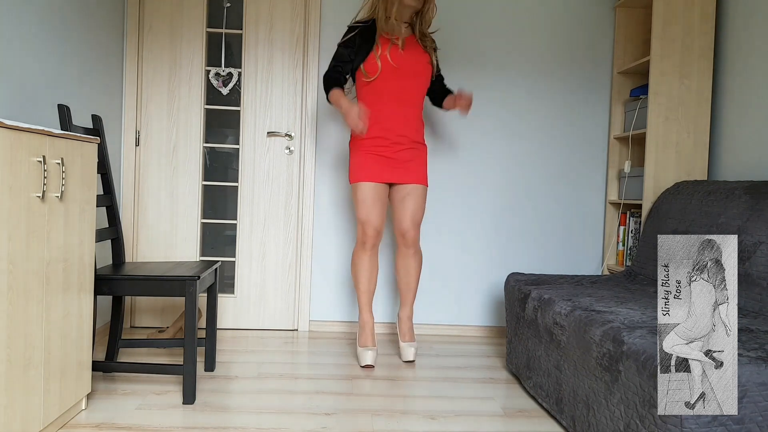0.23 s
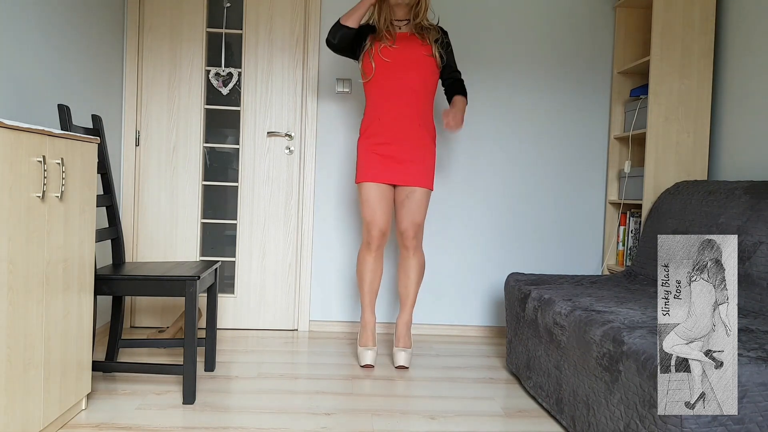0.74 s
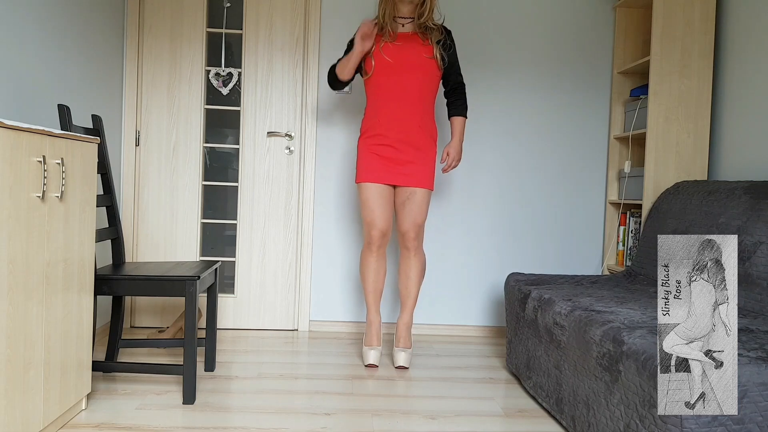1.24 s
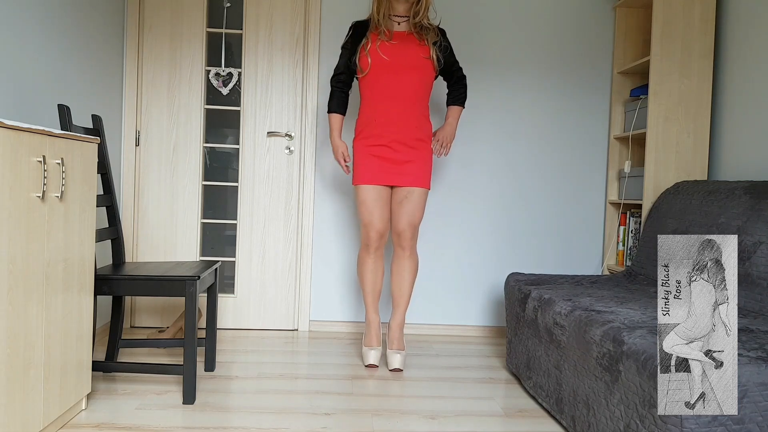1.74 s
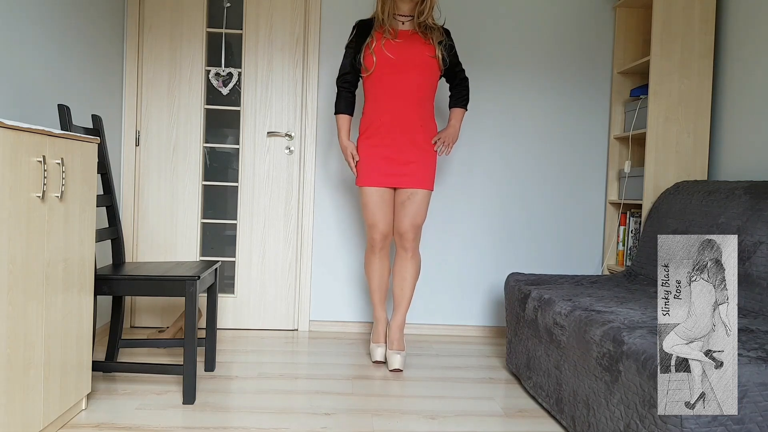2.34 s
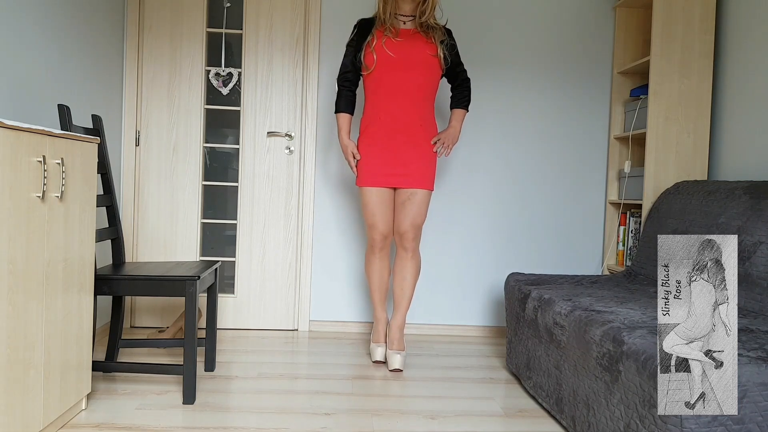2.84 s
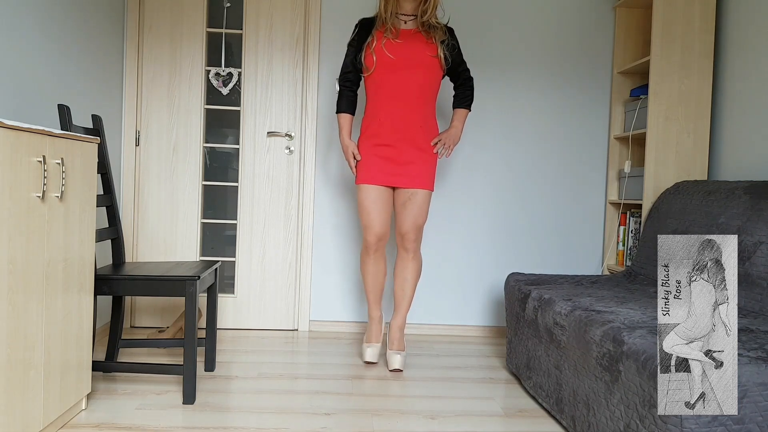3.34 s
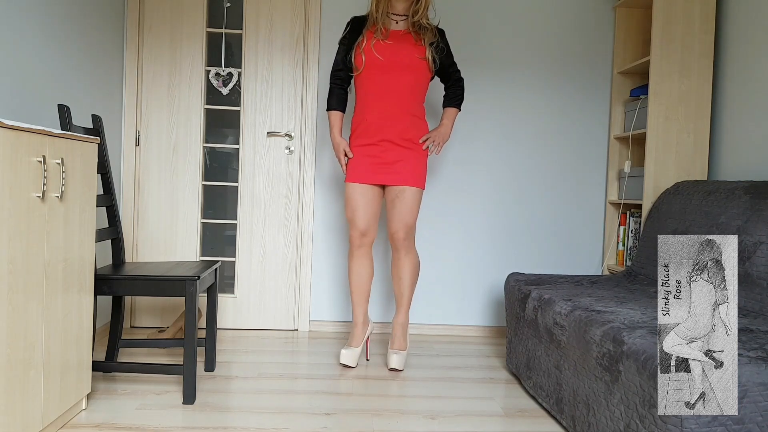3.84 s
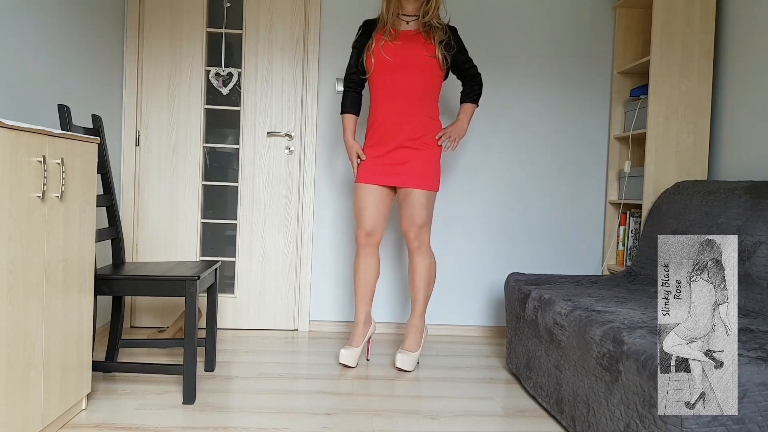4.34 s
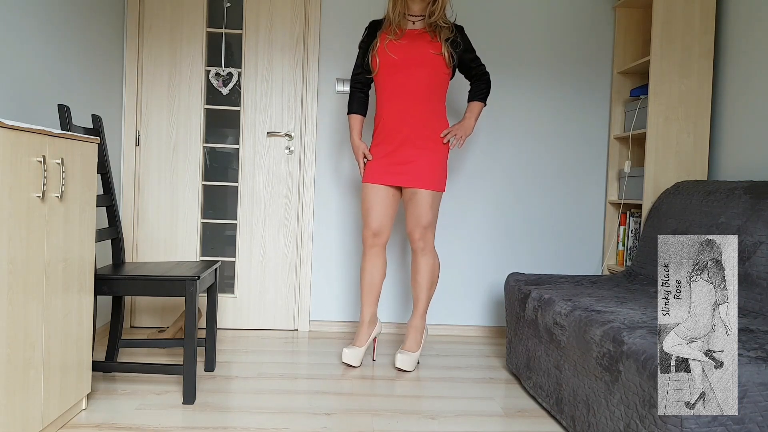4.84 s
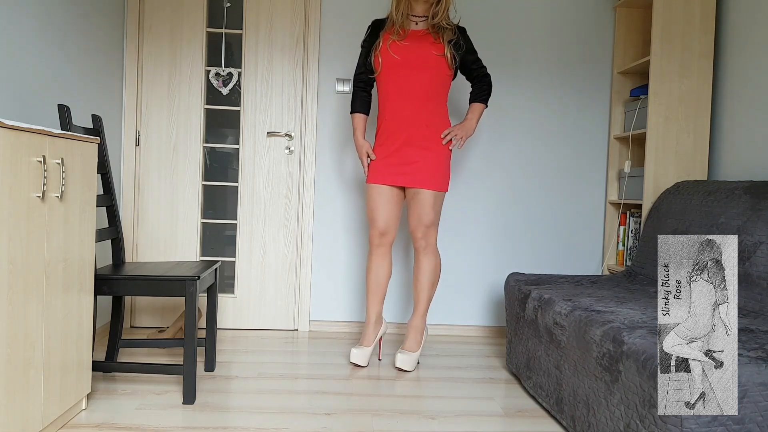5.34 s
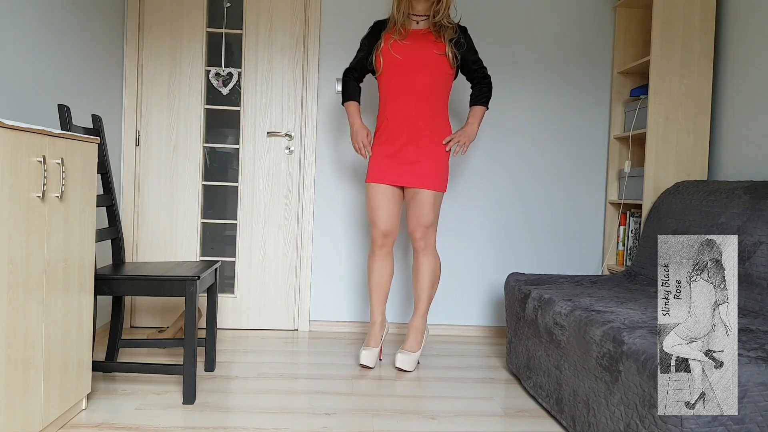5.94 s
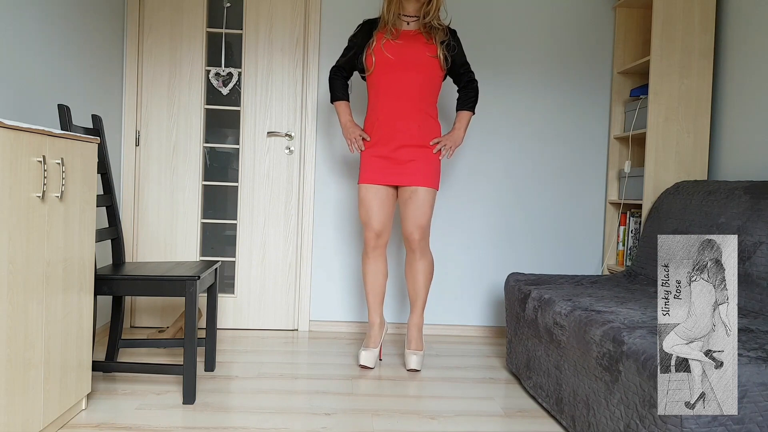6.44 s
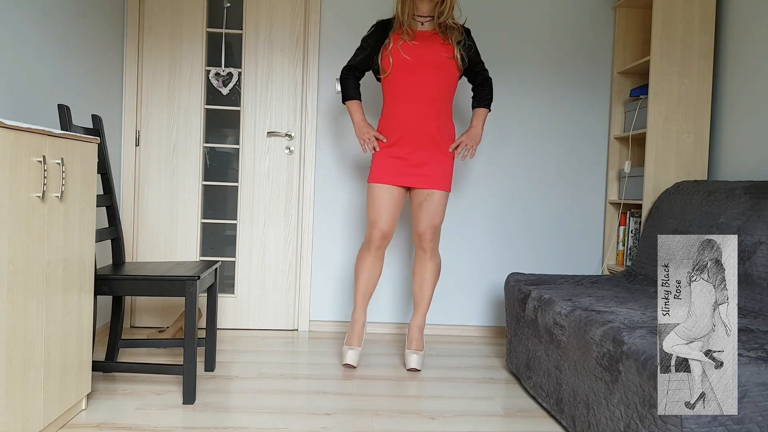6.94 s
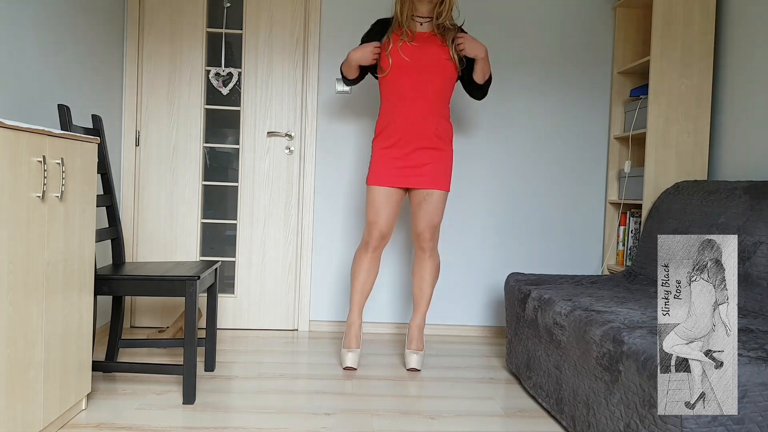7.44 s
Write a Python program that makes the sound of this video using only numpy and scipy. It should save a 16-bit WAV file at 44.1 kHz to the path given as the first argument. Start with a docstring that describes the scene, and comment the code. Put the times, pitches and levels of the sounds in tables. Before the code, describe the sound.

High heels step and shift on a hollow laminate floor in a small furnished room, a few metres from the microphone. The hardest step comes early, with a dry swish and a bright slap. Lighter knocks and soft sole drags follow, pause for about a second, then go on unevenly to the end. Each knock has a short room echo, over quiet room tone and hiss.

```python
"""High heels step and shift on a hollow laminate floor in a small furnished room, a few metres away.
From the start, over quiet room tone and microphone hiss, each heel knocks the boards, the near walls
repeat the knock, and soles rub between the steps. Half a second in, the hardest step lands with a dry
swish and a bright slap. Lighter steps and drags follow, pause for about a second near the three-second
mark, then go on unevenly to the end."""
import sys
import numpy as np
from scipy import signal
from scipy.fft import rfft, irfft, next_fast_len
from scipy.io import wavfile
from scipy.ndimage import uniform_filter1d, map_coordinates

SR = 44100
rng = np.random.default_rng(int(sys.argv[2]) if len(sys.argv) > 2 else 0)


def dump(signal):
    """Clip the signal to [-1, 1] and save it as 16-bit WAV at the path in sys.argv[1]."""
    limited = np.clip(np.atleast_2d(signal).T, -1, 1)
    pcm = np.round(limited * 32767).astype(np.int16)
    wavfile.write(sys.argv[1], SR, pcm)


N = 339744

# Spectrum of room tone and hiss: (frequency [Hz], relative level [dB])
TONE_SPECTRUM = [(15, -6), (40, 3), (60, -0.5), (115, -1), (250, -2.5), (340, -12), (410, -3), (600, -18.5),
                 (1000, -6.5), (2000, -12.5), (5000, -23), (8500, -27), (11000, -24.5), (14500, -20)]
# Left-right coherence of the room tone: (frequency [Hz], coherence [0-1])
TONE_COHERENCE = [(25, 0.9), (60, 0.83), (180, 0.44), (400, 0.85), (800, 0.11), (1650, 0), (5000, 0)]
# Heel impacts: (time [s], knock peak before the room [dB], knock pitch [Hz],
# thud level [dB re knock], click level [dB re knock], click pitch [Hz])
IMPACTS = [(0.0, -32, 585, -22, -11.5, 2630), (0.212, -59.5, 360, -28, 0, 2450),
           (0.321, -54.5, 372, -24, 0, 2020), (0.527, -26, 504, -27, -12, 3200),
           (0.979, -46.5, 1200, -39, -5, 2130), (1.156, -57, 786, -39, -7, 3290),
           (1.198, -55.5, 530, -38, -16, 2736), (1.25, -52.5, 553, -26, -19, 2860),
           (1.292, -57, 500, -12, -3, 2520), (1.554, -57, 394, -20, -19, 2470),
           (1.601, -50.5, 1140, -26, -7, 2150), (1.772, -37, 554, -20.5, -13, 3840),
           (1.862, -39, 620, -21, -24, 2400), (2.121, -62, 355, -16, 8, 3366),
           (2.237, -36.5, 630, -21, -7, 4280), (2.484, -54, 346, -39, -3, 2250),
           (2.496, -48, 653, -45, -36, 2300), (3.71, -42.5, 585, -21, -11.5, 2606),
           (3.749, -42.5, 670, -25.5, -28, 2447), (4.169, -51, 472, -16.5, -6, 2710),
           (4.24, -29.5, 605, -28, -19, 2770), (4.471, -58.5, 530, -33, -2, 2500),
           (4.609, -50, 620, -25, -13, 2750), (4.787, -57, 552, -25, -3, 3430),
           (4.925, -45.5, 550, -29, -15, 2410), (5.264, -31, 606, -29, -18.5, 2970),
           (6.083, -58, 360, -14, -8, 3498), (6.403, -61, 377, -16, 18, 3560),
           (6.44, -57.5, 355, -22, 7.5, 2200), (6.477, -49, 1190, -26, -18, 2450),
           (6.572, -39.5, 557, -22, -17.5, 2550), (6.766, -33.5, 640, -27.5, -17, 2470),
           (6.889, -56, 470, -27, -5, 2310), (7.2, -33.5, 470, -20, -19.5, 3230),
           (7.257, -44, 430, -18, -10.5, 2380), (7.597, -62, 353, -13.5, -9, 2470)]
# Early reflections from near surfaces: (delay [s], left gain [dB], right gain [dB])
REFLECTIONS = [(.0025, -3.5, 6.5), (.0045, 6, -6), (.0075, 2, -2), (.0100, 0.5, -30), (.0140, 7, -14.5),
               (0.018, -19, -21), (0.023, -35, 3.5), (.0300, 0.5, -26)]
# Normal modes of floor and room: (frequency [Hz], bandwidth [Hz], mean gain [dB])
MODES = [(128.5, 8.5, 16.5), (172.5, 5.5, 27), (238, 22, 17), (311, 28.7, 17), (344.8, 5.5, 17.5),
         (536.5, 2.9, 4.5), (542, 54, 12), (672.6, 36, 15.5), (820, 25, 12), (826, 6.9, 19), (1030, 15, -5)]
# Reverberation time of the diffuse tail: (frequency [Hz], time to fall 60 dB [s])
TAIL_T60 = [(100, 0.73), (260, 0.53), (700, 0.29), (1800, 0.48), (5000, 0.39), (12000, 0.75)]
# Left-right coherence of the diffuse tail: (frequency [Hz], coherence [0-1])
TAIL_COHERENCE = [(60, 0.94), (180, 0.98), (550, 0.67), (1650, 0.046), (4960, 0.045), (15000, 0.02)]
# Soles dragging: (start [s], duration [s], rumble level [dB], brightness [0-1], scuff level [dB])
DRAGS = [(0, 0.034, -51, 0.2, -63.5), (0.097, 0.11, -58.5, 0.84, -73.5), (0.317, 0.054, -66, 0.91, -69),
         (0.506, .02, -40, 0.084, -53), (0.567, 0.15, -57.5, 0.83, -65.5), (0.688, 0.085, -60, 1, -62),
         (1.12, 0.21, -69.5, 0.21, -74.5), (1.482, 0.11, -66, 0.41, -71.5), (1.76, .15, -56, 0.36, -71.5),
         (1.94, .13, -56.5, 0.94, -68.5), (2.096, 0.025, -55, 0.88, -63.5),
         (3.855, 0.097, -55.5, 0.78, -66.5), (4.176, 0.12, -55, 0.64, -73), (4.406, 0.095, -61, .9, -81),
         (4.531, 0.055, -61.5, 0.17, -70.5), (4.814, 0.16, -65.5, 0.14, -74.5),
         (5.037, 0.091, -61.5, 0.32, -69.5), (6.308, 0.077, -63, 0.38, -82), (6.353, 0.1, -61.5, 1, -68),
         (6.596, 0.17, -53, 0.87, -66), (6.772, 0.038, -72, 0.28, -80), (6.852, 0.046, -58, 1, -68),
         (7.062, 0.087, -71, 0.48, -66.5), (7.513, .15, -69, 0.5, -72.5)]
# Board rumble under a slow and a fast sole: (frequency [Hz], relative level [dB])
DULL_SPECTRUM = [(60, -36), (150, -16), (350, -1), (600, -5.5), (1050, -13.5), (1600, -55), (2500, -34)]
BRIGHT_SPECTRUM = [(60, -47), (250, -15), (600, -7.5), (1050, 2), (1500, -5.5), (2300, -10), (3500, -32.5)]
# Surface noise of a sole scuffing, swishing and slapping: (frequency [Hz], relative level [dB])
SCUFF_SPECTRUM = [(900, -41), (1700, 1.5), (3000, -1.5), (4800, -0.5), (7000, -7), (9500, -25),
                  (12000, -50)]
SWISH_SPECTRUM = [(5000, -27), (7000, 6), (9500, 6), (13000, 8), (16000, -4.5)]
SLAP_SPECTRUM = [(2500, -21), (4500, 8.5), (6500, -12), (9000, -11), (12000, -4), (16000, -10)]
# Imbalance of the two microphone ports: (frequency [Hz], left over right [dB])
PORT_BALANCE = [(100, -1), (700, -1), (2400, 0.5), (4400, 1.5), (8000, -2), (13000, 0.7)]


def amp(db):
    """Amplitude ratio of a level in decibels."""
    return 10 ** (np.asarray(db) / 20)


def unit(x):
    """Normalisation to an rms of 1."""
    return x / np.sqrt(np.mean(x ** 2) + 1e-20)


def along(points, hz):
    """Interpolation of (frequency, value) points on a logarithmic frequency axis."""
    f, values = np.transpose(points)
    return np.interp(np.log(hz + 1), np.log(f + 1), values)


def filtered(x, response):
    """Linear filtering: the spectrum of x is multiplied by a frequency response."""
    n = x.shape[-1]
    size = next_fast_len(n + SR // 4)
    return irfft(rfft(x, size) * response(np.fft.rfftfreq(size, 1 / SR)), size)[..., :n]


def resonance(f, hz, width):
    """Response of a damped oscillator, with gain 1 at its natural frequency."""
    return 1j * f * width / (hz * hz - f * f + 1j * f * width)


def stereo_field(pair, coherence, colour):
    """Partial coherence: two independent noises are weighted as mid and side."""
    angle = lambda f: np.arccos(np.clip(along(coherence, f), -1, 1)) / 2
    mid, side = filtered(pair, lambda f: colour(f) * [np.cos(angle(f)), np.sin(angle(f))])
    return np.array([mid + side, mid - side])


def wobble(rate):
    """Random modulation: a spline through `rate` Gaussian values a second."""
    return map_coordinates(rng.standard_normal(int(N * rate / SR) + 4), [np.arange(N) * rate / SR])


def room_tone():
    """Noise floor: far traffic and house noise drift slightly; the treble is microphone hiss."""
    spectra = signal.stft(rng.standard_normal((2, N)), nperseg=512)[2]
    drift = uniform_filter1d(rng.standard_normal(spectra.shape[1:]), size=5, axis=0)
    drift_db = 0.77 * unit(uniform_filter1d(drift, size=14, axis=1))
    pair = signal.istft(spectra * amp(drift_db), nperseg=512)[1][:, :N]
    return amp(-65.5) * unit(stereo_field(pair, TONE_COHERENCE, lambda f: amp(along(TONE_SPECTRUM, f))))


def heel_impact(pitch_hz, thud_db, click_db, click_hz):
    """Impact excitation: the board dips and rings briefly, the slab thuds, the hard tip clicks."""
    force = -np.exp(-np.arange(SR // 20) / SR / 0.00032)
    board = lambda f: resonance(f, pitch_hz, .8 * pitch_hz)
    knock = filtered(force, lambda f: board(f) * resonance(f, 464, 1530) * resonance(f, 816, 1510))
    thud = filtered(force, lambda f: resonance(f, 124, 120) * resonance(f, 145, 190))
    tip = lambda f: resonance(f, click_hz, .6 * click_hz) * resonance(f, 3500, 5000)
    click = filtered(signal.unit_impulse(len(force)), lambda f: tip(f) / (1 + 1j * f / 7500) ** 3)
    unit_peak = lambda x: x / np.abs(x).max()
    return unit_peak(knock) + amp(thud_db) * unit_peak(thud) + amp(click_db) * unit_peak(click)


def room_response(tail_db):
    """Impulse response from one random spot: direct sound, modes, reflections and diffuse tail."""
    n = SR // 2
    hz, t, spectra = signal.stft(rng.standard_normal((2, n)), SR, nperseg=256)
    build_up = 1 - np.exp(-t / .007)  # a diffuse field takes several reflections to form
    decay = amp(-60 * t / along(TAIL_T60, hz)[:, None])
    tail = signal.istft(spectra * build_up * decay, SR, nperseg=256)[1][:, :n]
    walls = np.zeros_like(tail)
    for delay_s, left_db, right_db in REFLECTIONS:
        arrival_s = delay_s + rng.normal(0, .0004) + rng.normal(0, .00006, 2)  # the feet move about
        gains = amp([left_db, right_db]) * amp(rng.normal(0, 0.59))
        walls[[0, 1], np.round(arrival_s * SR).astype(int)] = gains
    walls = filtered(walls, lambda f: 1 / (1 + 1j * f / 2600))  # furniture scatters the treble
    impulse = signal.unit_impulse(n)
    couplings = (-1) ** np.arange(len(MODES)) * amp(rng.normal(0, 2.05, len(MODES)))
    modes = filtered(impulse, lambda f: sum(coupling * amp(db) * resonance(f, centre, width)
                                            for coupling, (centre, width, db) in zip(couplings, MODES)))
    direct = filtered(amp(2) * impulse, lambda f: 1 / (1 + 1j * f / 5500))  # treble aims at the floor
    return direct + modes + walls + amp(tail_db) * stereo_field(tail, TAIL_COHERENCE, np.ones_like)


def footsteps():
    """Convolution: each impact excites the room from its own spot."""
    out = np.zeros((2, N + SR))
    for start, db, *timbre in IMPACTS:
        tail_db = -18.5 + 0.1 * (db + 33.5)  # a harder blow shakes more floor
        heard = signal.fftconvolve(heel_impact(*timbre)[None], room_response(tail_db), axes=1)
        out[:, round(start * SR):][:, :heard.shape[1]] += amp(db) * heard
    return out[:, :N]


def drag_power(start, length, db):
    """Power envelope of a drag: a rise that is slower in long drags, a hold, exponential decay."""
    rise_s, release_db_per_s = 0.011 + .35 * length, 170
    t = np.arange(N) / SR - start
    rise = np.clip(t / rise_s, 0, 1)
    return (rise * amp(db - release_db_per_s * np.clip(t - length, 0, None))) ** 2


def grit(spectrum):
    """Friction noise: grit under the sole catches in uneven clumps."""
    catches = rng.standard_normal(N) * amp(3.5 * wobble(150) + 1.1 * wobble(25))
    return unit(filtered(catches, lambda f: amp(along(spectrum, f))))


def reverberated(source, shift_s=.2):
    """Time-varying convolution: as the feet move, the room response cross-fades from spot to spot."""
    hop = round(shift_s * SR)
    padded, out = np.pad(source, (hop, 2 * hop)), np.zeros((2, N + 3 * hop + SR))
    for at in range(0, N + hop, hop):
        response = room_response(tail_db=-25.5)
        response = unit(response) / np.sqrt(response.shape[1])  # unit mean energy per channel
        piece = padded[at:at + 2 * hop] * signal.windows.hann(2 * hop, sym=False)
        heard = signal.fftconvolve(piece[None], response, axes=1)
        out[:, at:at + heard.shape[1]] += heard
    return out[:, hop:hop + N]


def sliding_soles():
    """Sliding friction: a sole shakes the boards, brighter when fast, and scuffs their surface."""
    rest_power, rest_brightness = amp(-71) ** 2, 0.19  # weight shifting on planted soles
    dull, bright = rest_power * (1 - rest_brightness), rest_power * rest_brightness
    scuff = amp(-81) ** 2
    for start, length, rumble_db, brightness, scuff_db in DRAGS:
        rumble = drag_power(start, length, rumble_db)
        dull += (1 - brightness) * rumble
        bright += brightness * rumble
        scuff += drag_power(start, length, scuff_db)
    swish = drag_power(start=0.47, length=.3, db=-70)  # around the hardest step
    boards = np.sqrt(dull) * grit(DULL_SPECTRUM) + np.sqrt(bright) * grit(BRIGHT_SPECTRUM)
    surface = np.sqrt(scuff) * grit(SCUFF_SPECTRUM) + np.sqrt(swish) * grit(SWISH_SPECTRUM)
    return reverberated(boards + surface)


def sole_slap(start_s=0.531, db=-44.5, t60_s=0.23):
    """Damped transient: the flat of the sole smacks down in fine treble cracks that die fast."""
    t = np.arange(N) / SR - start_s
    envelope = (t > 0) * amp(db - 60 * np.abs(t) / t60_s)
    cracks = rng.standard_normal((2, N)) * amp(6 * np.array([wobble(300), wobble(300)]))
    return envelope * unit(filtered(cracks, lambda f: amp(along(SLAP_SPECTRUM, f))))


def scene():
    """Superposition: the pressures of all the sources add."""
    return room_tone() + footsteps() + sliding_soles() + sole_slap()


def record(dry):
    """Transduction: the two ports differ in colour; the converter limits the band and adds an offset."""
    cutoff_hz, dc_offset = 14535, -.00046
    response = lambda f: amp(np.outer([.5, -.5], along(PORT_BALANCE, f))) * (f < cutoff_hz)
    return filtered(dry, response) + dc_offset


dry = scene()
out = record(dry)
dump(out)
```